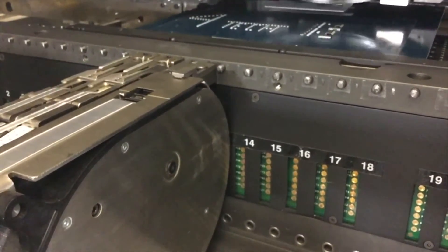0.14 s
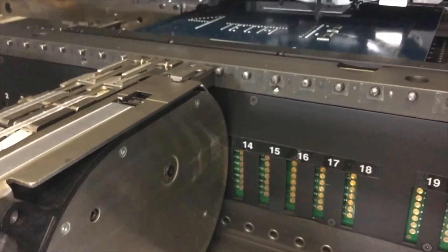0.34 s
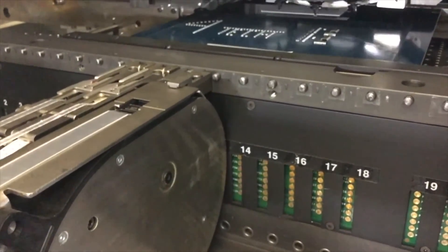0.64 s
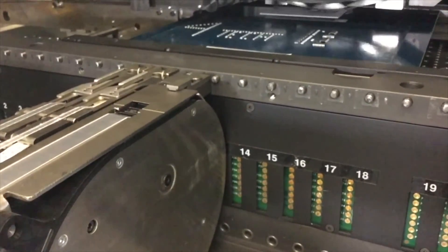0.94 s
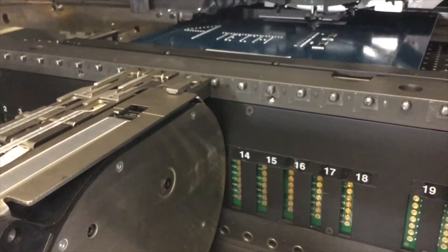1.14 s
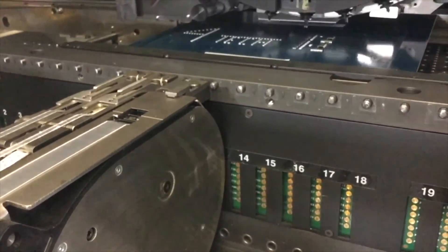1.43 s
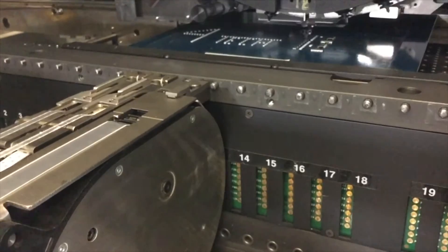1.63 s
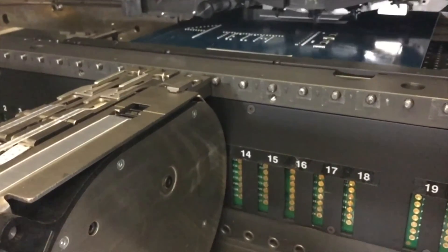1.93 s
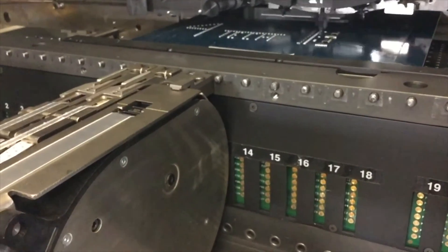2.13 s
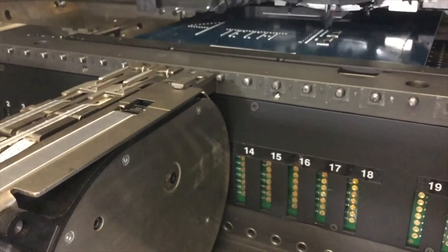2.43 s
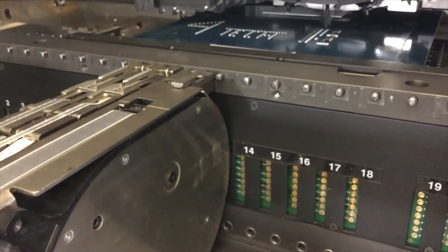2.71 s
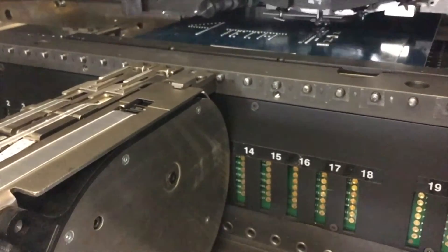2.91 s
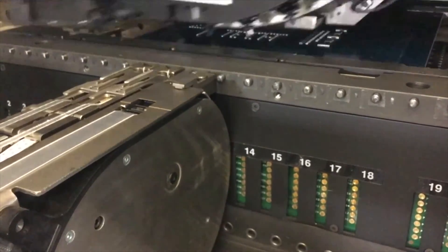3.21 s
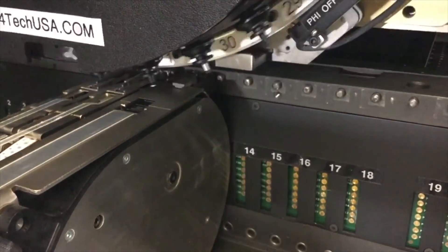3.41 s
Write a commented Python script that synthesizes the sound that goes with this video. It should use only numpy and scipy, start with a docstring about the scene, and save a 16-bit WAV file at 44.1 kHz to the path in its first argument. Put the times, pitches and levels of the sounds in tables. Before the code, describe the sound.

A circuit board placement machine, heard close in a workshop, rumbles deep, dull and quiet at slowed speed with sparse soft chuffs, then speeds up and gets louder, chuffing rapidly before a whistling air burst.

```python
"""A circuit board placement machine in slow motion: its head lets out short hisses and one long whistling air burst.
Around it, air roars, the frame rumbles in low resonances and a pump chuffs ten times a machine second; fans hum.
Noise is shaped by colour and resonances; whistles add wavering tones, and squeaks are brief gliding tones.
All plays at quarter speed first, deep and dull, then steps up to full speed. Sources run in machine time;
table times are heard times, pitches are those at full speed, and levels come before the playback volume."""
import sys
import numpy as np
from scipy import signal
from scipy.fft import rfft, irfft
from scipy.io import wavfile
from scipy.ndimage import uniform_filter1d, map_coordinates

SR = 44100
rng = np.random.default_rng(int(sys.argv[2]) if len(sys.argv) > 2 else 0)


def to_wav(s):
    """Save 16-bit WAV."""
    ch = np.atleast_2d(s).T  # columns
    pcm = np.round(np.clip(ch, -1, 1) * 32767)  # PCM
    wavfile.write(sys.argv[1], SR, pcm.astype(np.int16))


N = 156996
SECONDS = np.arange(N) / SR
LEAD_S = .3  # machine time already gone when playback starts

# playback speed steps: t/s, share of real speed
SPEED_STEPS = [(0, .25), (1.855, .375), (1.962, .5), (2.034, .645), (2.085, .735), (2.111, 1)]


def amp(db):
    """Decibels to amplitude factor."""
    return 10 ** (np.asarray(db) / 20)


def evened(x):
    """Scales to an RMS of one."""
    return x / np.sqrt(np.mean(x ** 2) + 1e-20)


def smoothed(x, size):
    """Two running means in a row along the first axis."""
    return uniform_filter1d(uniform_filter1d(x, size=size, axis=0), size=size, axis=0)


def playhead():
    """Machine time (s) that is heard at each sample."""
    t, share = np.transpose(SPEED_STEPS)
    step = np.searchsorted(t, SECONDS, "right") - 1
    return LEAD_S + np.cumsum(share[step]) / SR


def since(heard_s):
    """Machine seconds since the moment heard at heard_s."""
    before_start = np.minimum(heard_s, 0) * SPEED_STEPS[0][1]
    return SECONDS - (np.interp(heard_s, SECONDS, playhead()) + before_start)


def curve(rows, column=1):
    """A table over heard time, laid out in machine time."""
    rows = np.array(rows)
    machine_s = np.interp(rows[:, 0], SECONDS, playhead())
    return np.interp(SECONDS, machine_s, rows[:, column])


def resonate(x, hz, width):
    """A one-pole resonance: shifts hz down to zero, smooths, shifts back."""
    turn = np.exp(2j * np.pi * hz * np.arange(len(x)) / SR)
    r = np.exp(-np.pi * abs(width) / SR)
    return 2 * (turn * signal.lfilter([1 - r], [1, -r], x / turn)).real


def ringing(x, hz, width):
    """The same resonance passed twice, for steeper skirts, at an RMS of one."""
    return evened(resonate(resonate(x, hz, width), hz, width))


def noise(colour, peaks, patchy_db, flicker_db):
    """Random short-time spectra: colour with drifting patches, plus resonances, under a shared flicker."""
    frames, hz = N // 256 + 5, np.fft.rfftfreq(1024, 1 / SR)
    real, imaginary, patches = rng.standard_normal((frames, 513, 3)).T
    patches = uniform_filter1d(patches, size=8, axis=0)  # across pitch
    patches = evened(uniform_filter1d(patches, size=10, axis=1))  # across time
    f, db = np.transpose(colour)
    colour_db = np.interp(np.log(hz + 1), np.log(f), db, -90, -90)[:, None]
    spectra = (real + 1j * imaginary) * amp(colour_db + patchy_db * patches)
    x = evened(signal.istft(spectra, nperseg=1024, noverlap=768)[1][:N])
    white = rng.standard_normal(N)
    for peak_hz, width, db in peaks:
        x = x + amp(db) * ringing(white, peak_hz, width)
    flicker = evened(smoothed(rng.standard_normal(N), 300))
    return evened(x * amp(flicker_db * flicker))


def two_bands(x, order, split_hz, levels):
    """Splits a noise at split_hz; each part follows its own level column."""
    low = signal.sosfiltfilt(signal.butter(order, split_hz, fs=SR, output="sos"), x)
    return evened(low) * amp(curve(levels)) + evened(x - low) * amp(curve(levels, column=2))


def gate(start, rise, hold, fall):
    """Linear rise, hold and exponential fall, in machine seconds from a heard start."""
    t = since(start)
    return np.clip(t / rise, 0, 1) * np.exp(-np.maximum(t - rise - hold, 0) / fall)


def hum():
    """Fans and motors of the workshop as one wash of coloured noise, with no level curve."""
    # hum colour: f/Hz, level/dB per Hz
    hum_colour = [(380, -30), (450, -3.5), (560, -3.5), (700, -0.5), (1000, -1.5), (1400, -3), (1900, -6.5),
                  (2600, -15.5), (4000, -29), (16000, -34.5)]
    return amp(-41) * noise(hum_colour, [], patchy_db=3.0, flicker_db=1.5)


def rumble():
    """The frame shakes in lumpy low resonances; deep and upper parts swell separately."""
    # frame colour: f/Hz, level/dB per Hz
    rumble_colour = [(15, -52), (28, -33), (81, -3), (122, 1.5), (170, -3.5), (260, 2), (342, -7.5),
                     (405, -1.5), (450, -12), (511, -29.5), (560, -26), (730, -42.5), (1230, -120)]
    # frame resonances: f/Hz, width/Hz, level/dB
    rumble_peaks = [(96, 30, -7), (215, 28, -7), (268, 28, -4), (340, 26, -4)]
    # swells of the frame: t/s, deep level/dB, upper level/dB
    rumble_levels = [(0, -45, -31), (.2, -26, -41), (.36, -37.5, -25.5), (.55, -36.5, -34),
                     (.8, -35.5, -39), (1.0, -38, -28.5), (1.2, -26.5, -35), (1.45, -33.5, -33),
                     (1.62, -31.5, -36.5), (2.05, -40, -34), (2.2, -36, -33.5), (2.26, -38, -34),
                     (2.37, -35.5, -35), (2.43, -30, -30.5), (2.52, -37, -37.5), (2.62, -34, -27),
                     (2.67, -41, -30), (2.74, -37, -31.5), (2.82, -35, -31.5), (2.898, -30, -34),
                     (2.945, -41, -24.5), (3.02, -34, -34), (3.074, -35, -23.5), (3.144, -44, -40),
                     (3.224, -31, -27), (3.32, -46, -34.5), (3.385, -31.5, -32), (3.43, -39.5, -32),
                     (3.56, -40, -32.5)]
    shake = noise(rumble_colour, rumble_peaks, patchy_db=2.2, flicker_db=.6)
    return two_bands(shake, 3, 160, rumble_levels)


def roar():
    """Air rushing through the machine; body and treble follow their own levels."""
    # air colour: f/Hz, level/dB per Hz
    roar_colour = [(1000, -24), (1500, -10), (1750, -8), (2300, -7), (3100, -4.5), (3750, -7),
                   (4300, -13.5), (5200, -16), (6500, -16.5), (8300, -21), (9500, -17), (11000, -15.5),
                   (12500, -17.5), (14000, -20), (15300, -27.5), (16000, -23)]
    # air resonances: f/Hz, width/Hz, level/dB
    roar_peaks = [(1770, 90, -13), (1985, 70, -15), (2670, 170, -12), (3150, 130, -7), (3600, 220, -8)]
    # strength of the air: t/s, body level/dB, treble level/dB
    roar_levels = [(0, -29, -36.5), (1.0, -28, -36.5), (1.5, -28, -36), (1.9, -28.5, -36.5),
                   (2.2, -27.5, -36), (2.45, -28, -36.5), (2.7, -30, -38), (2.9, -34.5, -39.5),
                   (3.0, -35.5, -41), (3.1, -40.5, -46.5), (3.2, -42.5, -42), (3.3, -39.5, -37),
                   (3.4, -41, -38.5), (3.43, -46, -48), (3.445, -33, -43.5), (3.5, -32.5, -37),
                   (3.56, -29.5, -37)]
    air = noise(roar_colour, roar_peaks, patchy_db=1.5, flicker_db=.6)
    return two_bands(air, 4, 4380, roar_levels)


def pump():
    """Each stroke is a short chuff of air through the pump's pipe."""
    # strokes, each starting rise_s ahead of t: t/s, level/dB, length/s (machine time, after the rise)
    strokes = [(-.1, -31.5, 0.032), (0.267, -35.5, 0.04), (0.65, -34, 0.025), (1.029, -38.5, 0.029),
               (1.377, -34.5, 0.041), (2.146, -42.5, 0.079), (2.242, -34, 0.035), (2.336, -31, 0.028),
               (2.425, -31.5, 0.03), (2.522, -32, 0.03), (2.607, -32, 0.038), (2.71, -30, 0.036),
               (2.821, -31, 0.04), (2.93, -28, 0.034), (3.028, -31.5, 0.045), (3.075, -35.5, 0.036),
               (3.166, -31, 0.055), (3.225, -31.5, 0.04), (3.314, -34, .04), (3.39, -30, 0.034),
               (3.476, -32, 0.035)]
    # chuff colour: f/Hz, level/dB per Hz
    stroke_colour = [(450, -13), (600, 1), (900, 4), (1500, 4.5), (2500, -2), (4000, -22.5), (8000, -22.5)]
    # pipe resonances: f/Hz, width/Hz, level/dB
    pipe_peaks = [(680, 50, -8), (1036, 50, -11), (1345, 70, -8), (1775, 110, -8), (2415, 100, -9)]
    rise_s, tail_s = .008, .008
    shape = np.zeros(N)
    for t, db, length in strokes:
        shape += amp(db) * gate(t - rise_s, rise_s, length - tail_s, tail_s)
    return shape * noise(stroke_colour, pipe_peaks, patchy_db=1.5, flicker_db=1.0)


def squeaks(count=32):
    """Brief gliding tones scattered through the long burst."""
    first_s, last_s = 3.215, 3.39
    low_hz, high_hz = 1000, 6000
    out = np.zeros(N)
    for when, pitch, glide, size in rng.random((count, 4)):
        t = since(first_s + when * (last_s - first_s))
        hz = low_hz * (high_hz / low_hz) ** pitch
        length_s = .03 * (.5 + size)
        progress = np.clip(t / length_s, 0, 1)
        bend = 1 + .04 * (glide - .5) * progress  # up or down
        out += 2 * np.sin(np.pi * progress) * np.sin(2 * np.pi * hz * t * bend)
    return amp(-43.5) * out  # RMS of one squeak


def whistles():
    """Narrow wavering lines in the burst: a pure tone blended with noise from a resonance at its pitch."""
    # whistles: f/Hz, start t/s, length/s, level/dB
    whistle_lines = [(1180, 3.285, .085, -36), (2375, 3.29, .045, -36), (1770, 3.235, .05, -41),
                     (1770, 3.345, .05, -37), (2010, 3.365, .03, -38), (1580, 3.33, .08, -42),
                     (2700, 3.34, .04, -39), (3525, 3.225, .04, -41), (3445, 3.33, .045, -38),
                     (3620, 3.335, .06, -42), (4000, 3.29, .04, -43), (2480, 3.43, .055, -42),
                     (5320, 3.24, .065, -36), (5325, 3.305, .07, -41), (7101, 3.27, .07, -43),
                     (9711, 3.24, .06, -46)]
    width_hz, flutter_db = 70, 2.5
    pure = .75  # share of the power in the tone
    out = np.zeros(N)
    for hz, start, length, db in whistle_lines:
        t = since(start)
        fuzz = ringing(rng.standard_normal(N), hz, width_hz)
        tone = np.sqrt(2) * np.sin(2 * np.pi * (hz * t + rng.random()))
        arch = np.sqrt(2 * np.sin(np.pi * np.clip(t / length, 0, 1)).clip(0))
        flutter = evened(smoothed(rng.standard_normal(N), 250))
        line = np.sqrt(pure) * tone + np.sqrt(1 - pure) * fuzz
        out += amp(db + flutter_db * flutter) * arch * line
    return out


def head():
    """Valves at the head release hiss in gated bursts; the long one whistles."""
    # air bursts: start t/s, rise/s, hold/s, fall/s, level/dB
    air_bursts = [(2.79, .002, .006, .006, -43), (2.996, .002, .008, .007, -40),
                  (3.1218, .0015, .003, .005, -41), (3.1418, .0015, .006, .006, -40),
                  (3.199, .0015, .006, .01, -41), (3.4386, .0015, .008, .008, -41),
                  (3.5094, .0015, .004, .005, -38), (3.048, .012, .022, .008, -37),
                  (3.212, .035, .13, .018, -30)]
    # hiss colour: f/Hz, level/dB per Hz
    burst_colour = [(700, -23), (1100, -10.5), (1600, -9), (2400, -13.5), (3500, -12), (5200, -4),
                    (8000, -7), (12000, -9), (16000, -11)]
    hiss = noise(burst_colour, [], patchy_db=1.2, flicker_db=.8)
    shape = sum(amp(db) * gate(*times) for *times, db in air_bursts)
    return shape * hiss + whistles()


def scene():
    """All sources in machine time, the same on both channels."""
    return np.tile(hum() + rumble() + roar() + pump() + squeaks() + head(), (2, 1))


def record(dry):
    """Band-limited microphone, replay at the stepped speeds with the volume ridden, then a final band limit."""
    # playback volume: t/s, level/dB
    volume = [(0, -10), (1.601, -11.5), (1.84, -10.5), (1.92, -14.5), (2.09, -15.5), (2.13, -7), (2.18, 0),
              (3.56, 0.5)]
    mic_edge_hz, final_edge_hz = 15560, 15380
    captured = rfft(dry[0]) * (np.fft.rfftfreq(N, 1 / SR) < mic_edge_hz)
    fine = 4 * irfft(captured, 4 * N)  # four times the rate, for clean reading between samples
    played = map_coordinates(fine, [4 * SR * playhead()], order=5)
    t, db = np.transpose(volume)
    played = played * amp(np.interp(SECONDS, t, db))
    low_pass = signal.firwin(1023, final_edge_hz, window=("kaiser", 10), fs=SR)
    return np.tile(signal.oaconvolve(played, low_pass, "same"), (2, 1))


dry = scene()
out = record(dry)
to_wav(out)
```